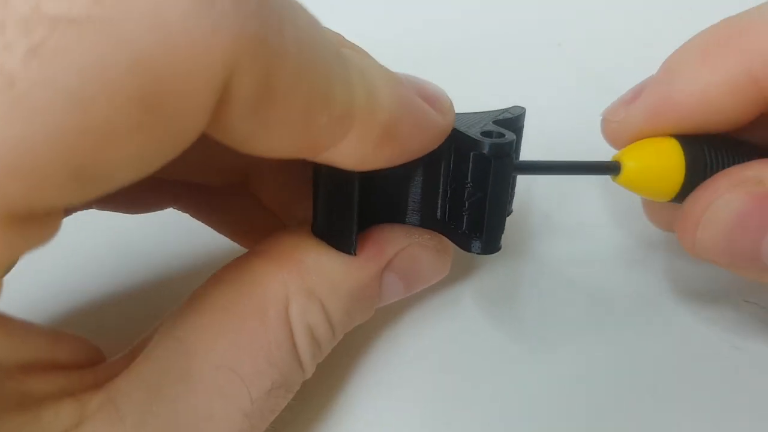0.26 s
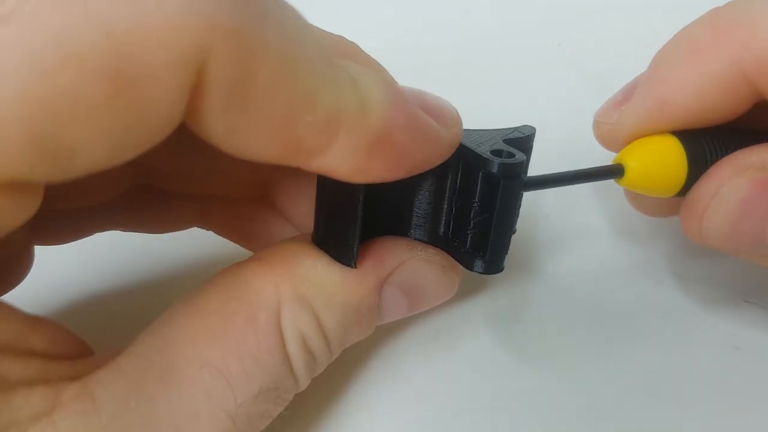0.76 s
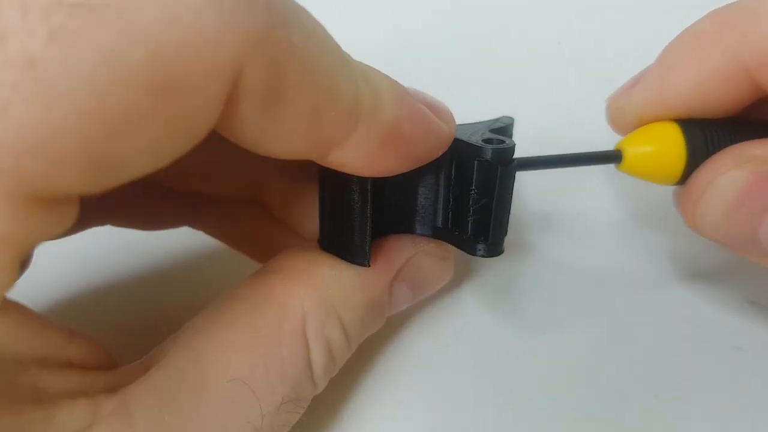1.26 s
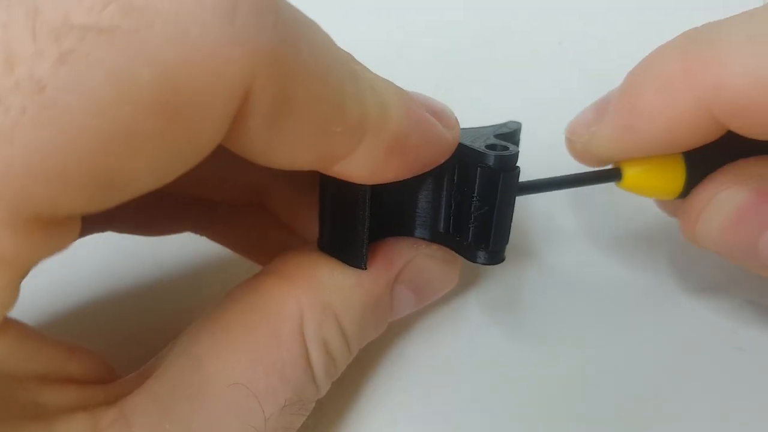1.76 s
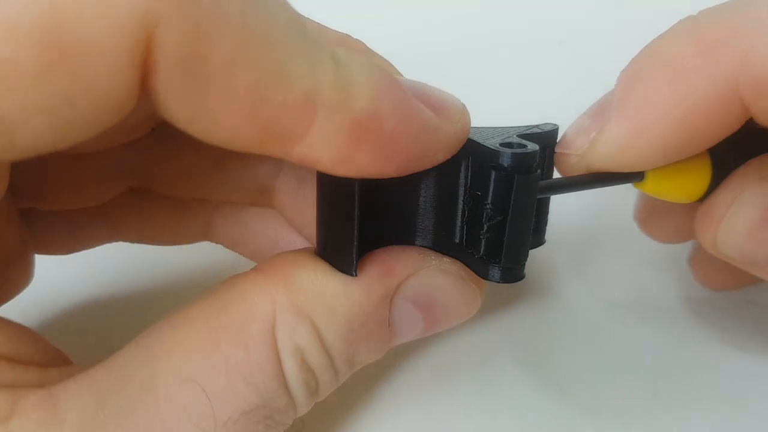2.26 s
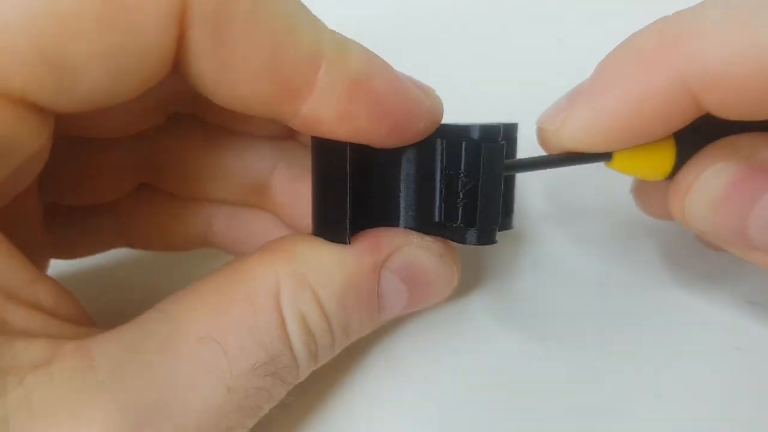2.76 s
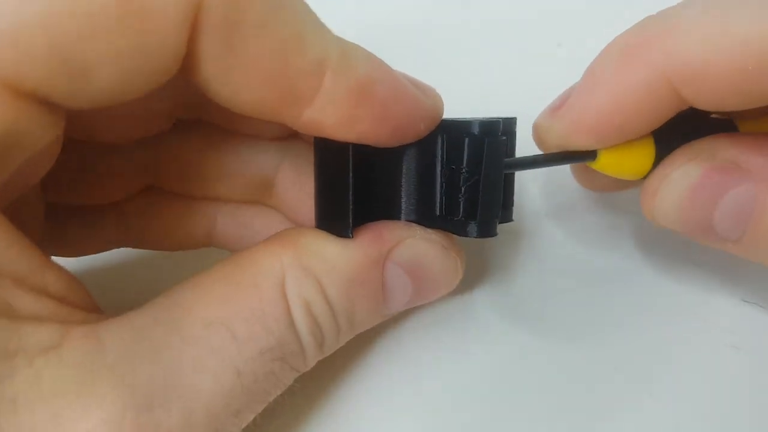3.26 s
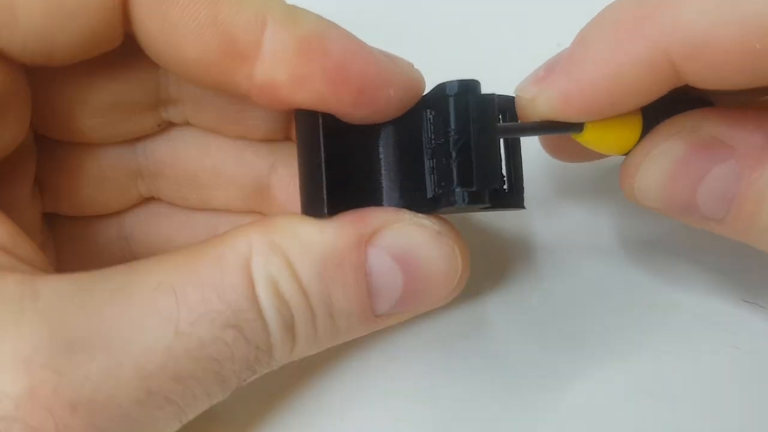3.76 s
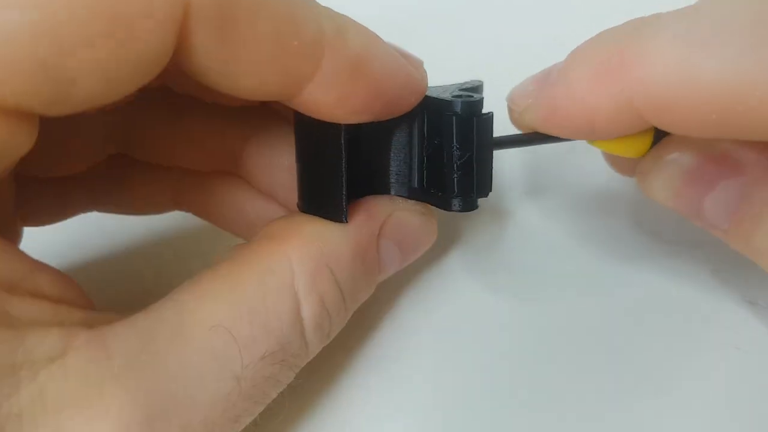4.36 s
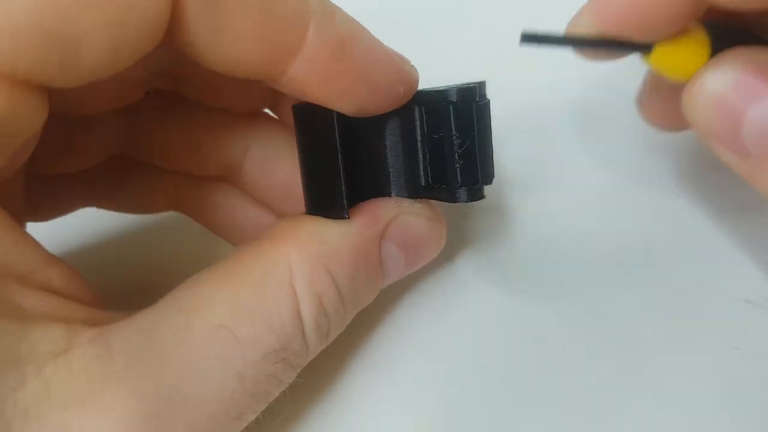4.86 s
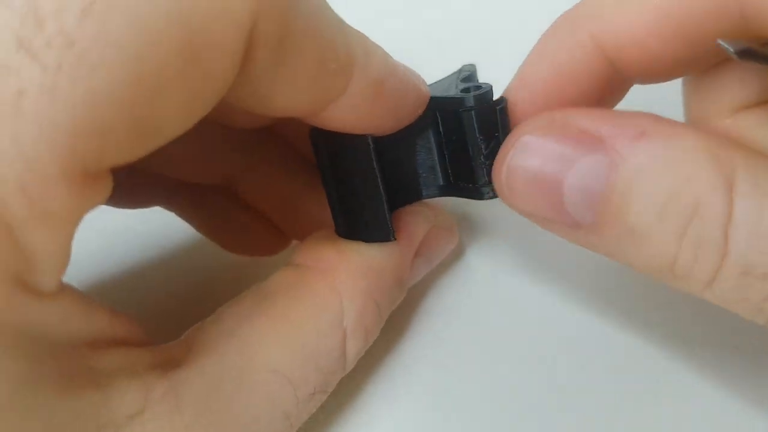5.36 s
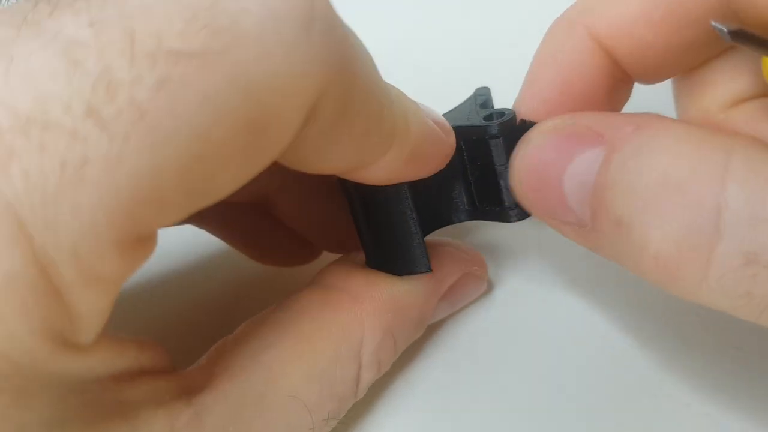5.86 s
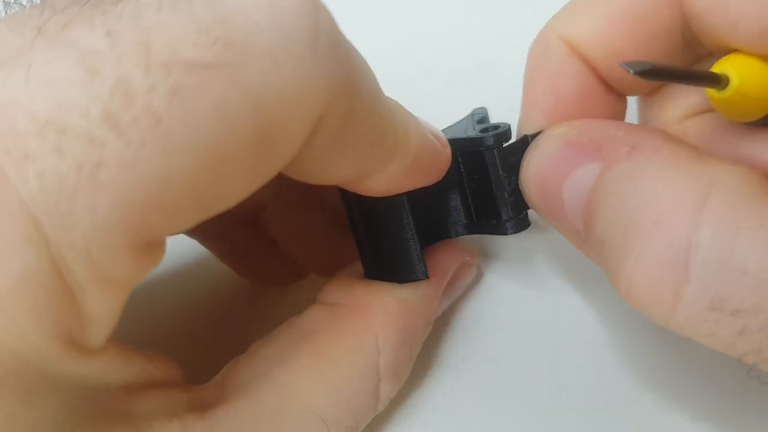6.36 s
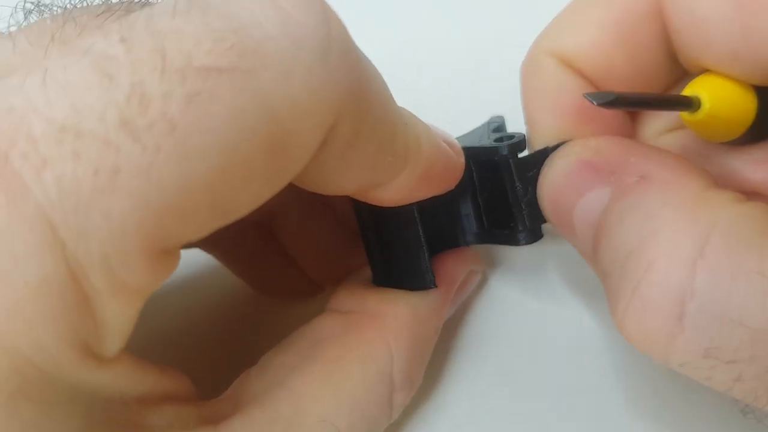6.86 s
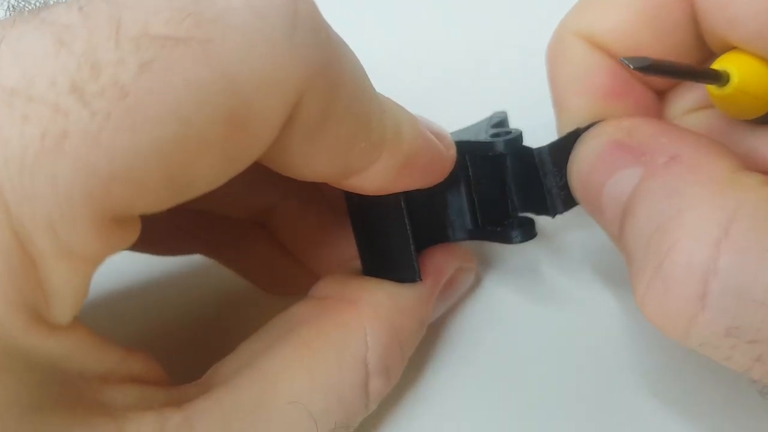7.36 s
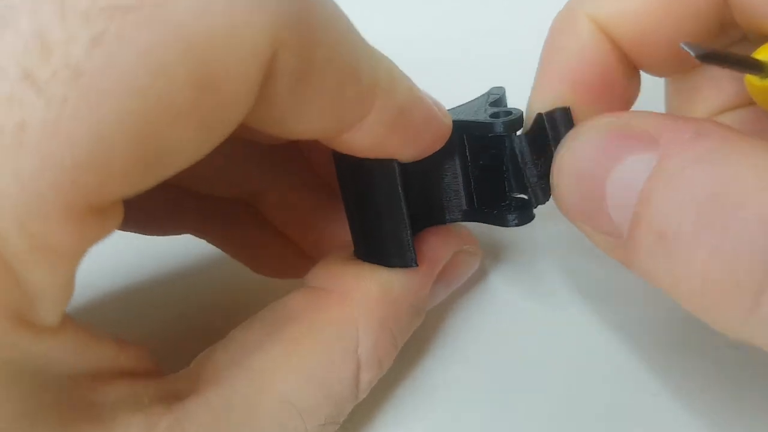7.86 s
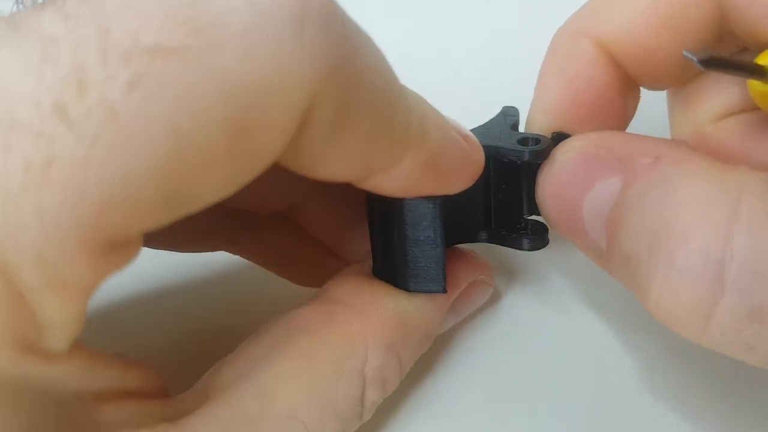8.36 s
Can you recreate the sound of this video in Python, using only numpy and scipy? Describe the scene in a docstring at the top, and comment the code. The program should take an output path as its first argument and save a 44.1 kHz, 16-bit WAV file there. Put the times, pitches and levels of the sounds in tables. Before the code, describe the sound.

A small indoor room has a faint mains hum, low rumble and soft hiss. Very close, a screwdriver tip picks at a hard plastic clip. After near silence, a loud bright double snap comes at 0.93 seconds, with smaller ones until 1.1. A weak tick at 1.66 precedes sharp snaps at 1.96 and 2.38. Soft skin skids thump the desk at 2.5 and around 3, among light ticks. The fullest snap lands at 3.63, with a thin steely rattle and smaller clicks to 3.8; another crisp snap follows at 4.24. From 4.5 to 6.4 there are only faint touches, tiny scrapes, a soft bump and skids. The freed latch clicks at 6.7 and 6.9, bursts into a dense, loud crackle of snaps at 7.05 to 7.1, then clicks at 7.31 with a slight ring. Quiet hum and a few faint ticks remain until about 8.6.

```python
"""A small room with a faint mains hum and, close to the microphone above a desk, a plastic clip in the hand.
A small screwdriver picks at its latch: the tip slips off edges with sharp snaps (noise cracks over damped
plastic modes) and scrapes (dense micro-slips); then fingers swing the freed latch over its catches.
Steel and latch ring on thinly, snaps jolt the hand, and skin skids softly on the desk in short slip trains.
Near echoes and a diffuse tail place it all in the room, over rumble and hiss."""
import sys
import numpy as np
from scipy import signal
from scipy.fft import rfft, irfft
from scipy.io import wavfile

SR = 44100
rng = np.random.default_rng(int(sys.argv[2]) if len(sys.argv) > 2 else 0)


def wav_out(sig):
    """Save sig, one row per channel (or a flat mono array), as 16-bit PCM at SR to the path in sys.argv[1]."""
    wavfile.write(sys.argv[1], SR, np.round(np.clip(np.atleast_2d(sig).T, -1, 1) * 32767).astype(np.int16))


N = 379260  # length in samples

# Mains hum in the room. Each row: frequency in Hz, level in dB rms before waver and background level.
HUM = [(60, -83.5), (120, -68), (240, -69.5), (360, -76)]
# Spectrum of room rumble and hiss. Each row: frequency in Hz, relative density in dB.
AIR_SPECTRUM = [(25, -7.5), (65, -6.5), (90, -7.5), (160, -8.5), (300, -9.5), (420, -16), (600, -19),
                (1000, -23), (2000, -26), (4000, -34), (6300, -41), (9000, -44), (13000, -38), (16000, -35)]
AIR_DB = -64  # rms of rumble and hiss, before the background level
# The background dips briefly. Each row: start in seconds, depth in dB.
DIPS = [(3.698, -5), (7.22, -2)]
DIP_FALL_S, DIP_HOLD_S, DIP_RECOVER_S = 0.17, 0.29, 0.5
BACKGROUND_DB = .3  # gain on hum and air outside the dips

# Echoes from the desk and things near it. Each row: delay in seconds, level in dB.
NEAR_ECHOES = [(.0031, -13.5), (.0046, -21), (.0095, -23), (0.019, -22.5)]
# Diffuse room tail. Each row: frequency in Hz, relative level in dB, time to fall 60 dB in seconds.
ROOM_TAIL = [(250, -14.5, .3), (1000, -9.5, 0.45), (2980, -8, 0.21), (6000, -16.5, .3), (8700, -10.5, 0.19),
             (15100, -16, 0.17)]

# Edges in Hz of the six frequency ranges that colour every contact.
RANGE_EDGES_HZ = [150, 2400, 4500, 6800, 10000, 13500, 16500]
# Shared colours before tilt, stress and levelling. Each holds one level in dB per range.
TOUCH_COLOUR_DB = [-18, -15, -8, -7.5, -7, -11]
TIP_COLOUR_DB = [-18.5, -17.5, -14.5, -14, -12, -13.5]
LATCH_COLOUR_DB = [-20, -19, -6.5, -4.5, 0, -0.5]
STRESS_OCTAVES = 0.35  # width of the stressed region

# Modes of the part with the tip wedged under the latch, then with the latch free to swing.
# Each row: frequency in Hz before grip scatter, relative energy in dB before colouring,
# time to fall 60 dB in seconds at the usual ring time.
WEDGED_MODES = [(640, -4, 0.0067), (1480, -4.5, 0.0061), (1910, -12, 0.0031), (3524, -18.5, 0.0066),
                (4700, -2.5, 0.0024), (6373, -1, 0.011), (7710, 6.5, 0.0033), (8620, -1.5, .007),
                (10800, -2.5, 0.0067), (12100, 10, 0.0046), (12950, -0.5, .005), (14300, 2.5, 0.0051),
                (15765, 2.5, .005)]
FREE_MODES = [(1850, -8.5, 0.0042), (3080, -4, 0.0054), (3670, -3.5, 0.0053), (4880, 0, .005),
              (5840, 3, 0.0072), (6460, -3, 0.0038), (7530, -3, 0.0049), (8400, -7.5, 0.01),
              (10730, -1, 0.0057), (12200, 4, .005), (14600, 4, 0.0056), (15670, 6.5, .005)]
TOOL_LEAVES_S = 5  # contacts from here on ring the free part

# Clearer touches of tip and fingernail. Each row: start in seconds, level in dB,
# brightness of the treble in dB per octave.
TOUCHES = [(.087, -55, -17), (1.2027, -51, -4.5), (1.2475, -54, -13), (2.7442, -50.5, -8),
           (2.9446, -52.5, -20.5), (3.2154, -48.5, -5.5), (3.5086, -47, -5.5), (3.5364, -46, -5.5),
           (3.9036, -44, 7.5), (4.3441, -55, -20), (4.4873, -53.5, -3.5), (4.5611, -48, -12),
           (4.7828, -52.5, -6.5), (4.7974, -45, -2.5), (5.027, -54, -16), (5.391, -46.5, 4.5),
           (5.5741, -54.5, 5), (5.868, -50.5, -1), (5.8871, -48, 3), (5.893, -46, -4),
           (6.2508, -47.5, -0.5), (6.2892, -45.5, -2.5), (6.351, -51.5, 6), (6.3611, -42.5, 12.5),
           (7.8582, -56.5, -6)]
# Spells in which the grip shifts and faint ticks come by chance. Each row: start in seconds,
# length in seconds, ticks per second, middle level in dB, middle brightness in dB per octave.
FIDGETS = [(1.218, 0.23, 10, -60, 1), (3.0, 1.3, 4, -60.5, -0.5), (4.477, .36, 11, -58.5, -6.5),
           (6.069, .15, 20, -55.5, 14), (7.596, 0.54, 4, -61.5, -8)]
# The tip slips off an edge; the piece that flexes stresses one region of the treble. Each row: start in
# seconds, level in dB, brightness in dB per octave, stressed frequency in Hz, stress in dB,
# ring time as a multiple of the usual (the click limits how short it gets).
TIP_SNAPS = [ (.7600, -35, 2, 6500, 5.5, 1), (.9333, -13.5, 0.55, 11020, 11, .8),
             (0.94, -21.5, 3, 15700, 16, .4), (.9833, -38, 2.5, 4750, 9, 1.4),
             (1.0567, -19, 3, 15600, 14.5, .6), (1.0972, -31, 7, 15700, 7, .6),
             (1.6615, -33.5, -.7, 2720, 12.5, 1.5), (1.9555, -19, 2.5, 13800, 16, .42),
             (2.135, -43.5, -1.5, 14300, 19.5, .7), (2.38, -15.5, 5, 3840, 2, .62),
             (3.6306, -11.5, 1.8, 10700, 9, 1.63), (3.7489, -26, 2, 6530, 8, 1.3),
             (3.7980, -22.5, 5, 15500, 3, .9), (4.2422, -16, 5.5, 4620, 1.5, .87)]
# The latch jumps a catch; a softer contact cuts the top lower. Each row: start in seconds, level in dB,
# stressed frequency in Hz, stress in dB, top in Hz, ring time as for the tip.
LATCH_SNAPS = [ (6.7081, -19, 6830, 16, 12800, 1.1), (6.8928, -19.5, 6810, 14.5, 11200, .62),
               (7.0550, -16.5, 6200, 15.5, 17000, .68), (7.0655, -19.5, 3700, 21.5, 16000, .86),
               (7.0654, -11, 5000, 28, 18000, .47), (7.0674, -18, 4400, 11, 16000, .76),
               (7.0907, -21, 5100, 12, 18000, .93), (7.0958, -26, 5200, 12.5, 18000, .9),
               (7.1044, -19, 5700, 15.5, 18000, 1), (7.3101, -20, 3900, 18.5, 18000, .61)]

# A snap of HARD_DB with the usual ring time jolts the hand at JOLT_DB.
# The jolt falls off faster than the snap (slope in dB per dB).
HARD_DB, JOLT_DB, JOLT_SLOPE = -13, -36, 1.8
# The hand bumps the desk as it regrips. Each row: start in seconds, level in dB.
BUMPS = [(4.562, -44.5), (5.892, -46.5)]
# Modes of the hand, the thin steel shaft and the latch. Each row: frequency in Hz,
# relative energy in dB, time to fall 60 dB in seconds.
HAND_MODES = [(84.6, -6, 0.045), (165, -1.5, 0.024), (264, -0.5, 0.026), (383, -1.5, .012),
              (680, -4.5, 0.02)]
SHAFT_MODES = [(1025, -12.5, 0.043), (1327, -5.5, .09), (1600, -11, .06), (3430, -10, 0.095),
               (7600, 2, 0.1), (7940, 0.5, 0.16), (7940, -4, .15)]
LATCH_MODES = [(3330, -8.5, .1), (3700, -3, 0.2), (4307, -10, 0.2), (6770, 2, 0.11), (7370, -6.5, .12)]
# The tip springs clear and the shaft rings; the latch jumps a catch and rings.
# Each row: start in seconds, level in dB.
SHAFT_RINGS = [(3.631, -25), (3.7474, -34), (3.798, -57)]
LATCH_RINGS = [(7.0662, -35.5), (7.3087, -28.5)]
RATTLE_HZ = 312  # new random gains per second in a rattling ring

# Tip or nail drags over the plastic. Each row: start in seconds, length in seconds, level in dB,
# brightness of the treble in dB per octave.
SCRAPES = [(1.657, 0.014, -55, -12), (4.588, 0.16, -78.5, -4), (4.749, 0.056, -59.5, -3),
           (4.985, .12, -73, -19.5), (5.281, 0.13, -77, -10), (6.051, 0.11, -82, 9),
           (6.352, 0.028, -76.5, 3), (7.077, 0.011, -43, 1)]

# Skin skids on the desk. Each row: start in seconds, length in seconds, level in dB.
SKIDS = [(2.537, 0.028, -46.5), (2.901, 0.027, -54), (2.99, 0.024, -55.5), (3.24, 0.021, -53.5),
         (5.483, 0.034, -49), (5.561, 0.023, -58)]
# Desk modes under the skin. Each row: frequency in Hz, relative energy in dB,
# time to fall 60 dB in seconds.
SKID_MODES = [(155.8, 3.5, 0.047), (266, 8, 0.017), (374, -0.5, 0.0045), (563, -7, 0.044), (759, -11, .07),
              (1010, -16, 0.061)]
SKID_HZ = 135.2  # mean slips per second

TOP_HZ = 15750  # low-pass edge of the recorder


def undb(db):
    """Decibels to gain."""
    return 10 ** (np.asarray(db) / 20)


def unit(x):
    """Scale to an energy of one."""
    return x / np.sqrt(np.sum(x ** 2))


def fade(t, t60):
    """Exponential decay, 60 dB in t60."""
    return np.exp(-np.log(1000) * t / t60)


def add(track, s, x):
    """Mix x into the track at time s."""
    i = int(s * SR)
    track[..., i:i + x.shape[-1]] += x[..., :N - i]


def along(freqs, points_hz, values):
    """Join values by straight lines on a log-frequency axis."""
    return np.interp(np.log(freqs + 1), np.log(points_hz), values)


def dips(t):
    """Level of the background in dB: each dip falls, holds and recovers."""
    corners = np.cumsum([0, DIP_FALL_S, DIP_HOLD_S, DIP_RECOVER_S])
    return BACKGROUND_DB + sum(np.interp(t - s, corners, [0, db, db, 0]) for s, db in DIPS)


def background(waver=0.054):
    """Mains hum, each harmonic wavering slightly in level, over shaped noise for room rumble and hiss."""
    t = np.arange(N) / SR
    freqs = np.fft.rfftfreq(N, 1 / SR)
    spectrum = rfft(rng.standard_normal(N)) * undb(along(freqs, *np.transpose(AIR_SPECTRUM)))
    out = unit(irfft(spectrum, N)) * np.sqrt(N) * undb(AIR_DB)
    knots = t[::SR // 6]
    for hz, db in HUM:
        size = 1 + waver * np.interp(t, knots, rng.standard_normal(len(knots)))
        out += np.sqrt(2) * undb(db) * size * np.sin(2 * np.pi * (hz * t + rng.random()))
    return out * undb(dips(t))


def room(straight, all_round, build_s=0.0053, scatter_s=0.0074, count=20):
    """Direct sound, scattered near echoes and a diffuse tail that builds and decays by frequency band."""
    t = np.arange(SR // 2) / SR
    freqs = np.fft.rfftfreq(len(t), 1 / SR)
    noise = rfft(rng.standard_normal(len(t)))
    points_hz, dbs, t60s = np.transpose(ROOM_TAIL)
    edges = np.geomspace(50, SR / 2, count)
    response = np.zeros(len(t))
    for lo, hi in zip(edges, edges[1:]):
        centre = np.sqrt(lo * hi)
        envelope = unit(fade(t, along(centre, points_hz, t60s)) * (1 - np.exp(-t / build_s)))
        band = irfft(noise * (freqs >= lo) * (freqs < hi), len(t))
        response += undb(along(centre, points_hz, dbs)) * envelope * band
    short = t[:SR // 100]
    for delay, db in NEAR_ECHOES:
        # uneven surfaces smear each echo a little
        smear = unit(rng.standard_normal(len(short)) * fade(short, scatter_s))
        add(response, delay, undb(db) * smear)
    return straight + signal.fftconvolve(all_round, response)[:N]


def colour(shared_db=TOUCH_COLOUR_DB, brightness=0, stressed_hz=SR, stress_db=0, top_hz=SR, flat_below_hz=1):
    """Range levels whose energies sum to 0 dB: a shared colour, tilted, with a stressed region and a top."""
    centres = np.convolve(RANGE_EDGES_HZ, [.5, .5], "valid")
    tilt = brightness * np.log2(np.maximum(centres, flat_below_hz))
    stress = stress_db * np.exp(-.5 * (np.log2(centres / stressed_hz) / STRESS_OCTAVES) ** 2)
    top = -10 * np.log10(1 + (centres / top_hz) ** 12)
    db = np.array(shared_db) + tilt + stress + top
    return db - 10 * np.log10(np.sum(undb(db) ** 2))


def touch_colour(brightness):
    """Range levels of a light touch: only the treble tilts."""
    return colour(TOUCH_COLOUR_DB, brightness, flat_below_hz=3000)


def coloured(x, range_db, size=8192):
    """Causal, smooth filter that gives each range its level, its energy counted over one millisecond."""
    spectrum = rfft(x, size)
    freqs = np.fft.rfftfreq(size, 1 / SR)
    edges = np.array(RANGE_EDGES_HZ)
    centres = (edges[1:] + edges[:-1]) / 2
    wanted = undb(range_db) ** 2 * SR / 1000
    log_gain = 0
    for _ in range(2):
        power = np.abs(spectrum * np.exp(log_gain)) ** 2
        energy = np.histogram(freqs, edges, weights=power)[0] * 2 / size
        log_gain = log_gain + np.interp(freqs, centres, np.log(wanted / energy) / 2)
    # folding the cepstrum makes the filter minimum phase, so nothing sounds early
    cepstrum = irfft(log_gain)[:size // 2]
    cepstrum[1:] *= 2
    return irfft(spectrum * np.exp(rfft(cepstrum, size)))


def ring(modes, t, damping=1, spread=0., in_phase=False):
    """Decaying modes; spread scatters their frequencies, and phases are random unless in phase."""
    hz, db, t60 = np.transpose(modes)[:, :, None]
    hz = hz * (1 + spread * rng.standard_normal(hz.shape))
    phase = 0 if in_phase else rng.uniform(0, 2 * np.pi, hz.shape)
    size = undb(db) * 2 / np.sqrt(t60 * SR / np.log(1000))
    return np.sum(size * np.cos(2 * np.pi * hz * t + phase) * fade(t * damping, t60), axis=0)


def click(s, range_db, hold=1, crack_db=2, crack_t60=0.017, rise_s=0.00027, all_round_db=4):
    """An edge lets go at time s: a short crack and the damped modes of the plastic.
    Two rows: what goes straight to the microphone, and what goes all round into the room."""
    t = np.arange(SR // 16) / SR
    modes = WEDGED_MODES if s < TOOL_LEAVES_S else FREE_MODES
    grip_spread = .02  # the grip shifts each mode a little
    damping = min(1 / hold, 1.3)  # the modes shorten only so far; the crack follows hold
    crack = undb(crack_db) * unit(rng.standard_normal(len(t)) * fade(t, crack_t60 * hold))
    straight = (crack + ring(modes, t, damping, grip_spread)) * (1 - np.exp(-t / rise_s))
    # summed over all directions the notches between the modes partly fill in
    all_round = ring(modes, t, damping, grip_spread, in_phase=True) + undb(all_round_db) * (t == 0)
    return np.array([coloured(straight, range_db), coloured(all_round, range_db)])


def picking(scatter_db=2):
    """Hard snaps of tip and latch, light touches, and faint ticks at random times as the grip shifts."""
    out = np.zeros((2, N))
    for s, db, brightness in TOUCHES:
        add(out, s, click(s, db + touch_colour(brightness), hold=0.72))
    for s, db, brightness, hz, stress_db, hold in TIP_SNAPS:
        range_db = db + colour(TIP_COLOUR_DB, brightness, hz, stress_db)
        add(out, s, click(s, range_db, max(hold, .3)))
    for start, length, rate, db, brightness in FIDGETS:
        for s in start + length * rng.random(round(rate * length)):
            louder, brighter = scatter_db * rng.standard_normal(2)
            add(out, s, click(s, db + louder + touch_colour(brightness + brighter)))
    for s, db, hz, stress_db, top_hz, hold in LATCH_SNAPS:
        range_db = db + colour(LATCH_COLOUR_DB, 0, hz, stress_db, top_hz)
        add(out, s, click(s, range_db, max(hold, .3)))
    return out


def jolts():
    """The harder and longer a snap, the more it shakes the hand: rows of start in seconds, level in dB."""
    rows = []
    for s, db, *_, hold in TIP_SNAPS + LATCH_SNAPS:
        longer_db = 10 * np.log10(max(hold, .3))
        rows.append((s, JOLT_DB + JOLT_SLOPE * (db - HARD_DB) + longer_db))
    return rows


def struck(modes, blows, rise_s=0.00011, rattles=False):
    """One set of modes rung by each blow; random gains make a loose piece rattle as it rings.
    Levels count the energy as if it came in one millisecond."""
    out = np.zeros(N)
    t = np.arange(SR // 3) / SR
    for s, db in blows:
        sound = ring(modes, t) * (1 - np.exp(-t / rise_s))
        if rattles:
            sound = sound * np.interp(t * RATTLE_HZ, np.arange(len(t)), rng.standard_normal(len(t)))
        add(out, s, undb(db) * np.sqrt(SR / 1000) * unit(sound))
    return out


def scraping(slips_per_s=800, scatter_db=4):
    """Dense micro-slips, uneven in time and strength, ring the plastic part."""
    out = np.zeros((2, N))
    for s, length, db, brightness in SCRAPES:
        count = int(length * slips_per_s) + 2
        slips = np.zeros((1, int(length * SR)))
        places = rng.integers(0, slips.size, count)
        slips[0, places] = undb(scatter_db * rng.standard_normal(count))
        sound = signal.fftconvolve(slips, click(s, touch_colour(brightness)))
        # the level is the rms over the length, averaged over both rows
        add(out, s, unit(sound) * np.sqrt(2 * slips.size) * undb(db))
    return out


def skidding(jitter=0.064, weakening_s=0.053):
    """Skin sticks and slips a few times, ever weaker; each slip thumps the desk."""
    out = np.zeros(N)
    t = np.arange(SR // 8) / SR
    thump = ring(SKID_MODES, t) * (1 - np.exp(-t / 0.00079))
    for s, length, db in SKIDS:
        slips = np.zeros(len(t))
        times = np.arange(0, length, 1 / SKID_HZ)
        times = np.abs(times + jitter / SKID_HZ * rng.standard_normal(len(times)))
        slips[(times * SR).astype(int)] = np.exp(-times / weakening_s)
        sound = unit(signal.fftconvolve(slips, thump))
        add(out, s, sound * np.sqrt(length * SR) * undb(db))
    return out


def scene():
    """Hands, tool and part close to the microphone, with the room around them."""
    hand = struck(HAND_MODES, jolts() + BUMPS)
    shaft = struck(SHAFT_MODES, SHAFT_RINGS, rattles=True)
    latch = struck(LATCH_MODES, LATCH_RINGS, rattles=True)
    # hand, rings and skids go equally into both rows
    straight, all_round = picking() + hand + scraping() + skidding() + shaft + latch
    return (room(straight, all_round) + background())[None]


def record(dry):
    """The recorder cuts the top: a steep elliptic low-pass."""
    return signal.sosfilt(signal.ellip(8, .2, 70, TOP_HZ, fs=SR, output="sos"), dry)


dry = scene()
out = record(dry)
wav_out(out)
```